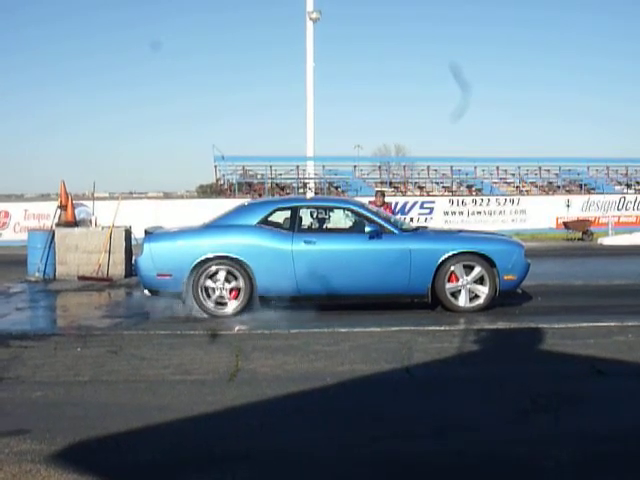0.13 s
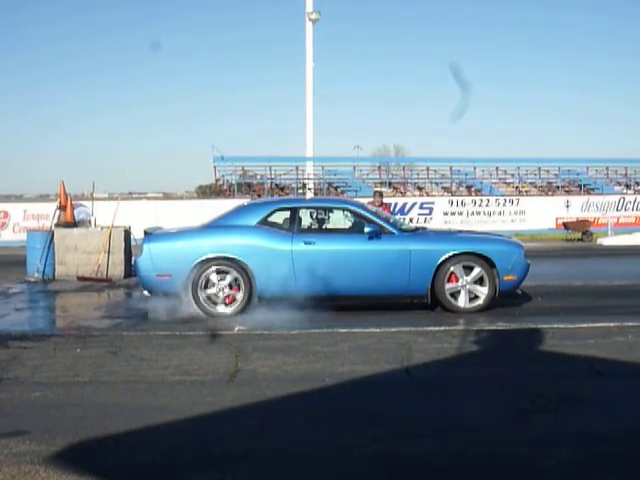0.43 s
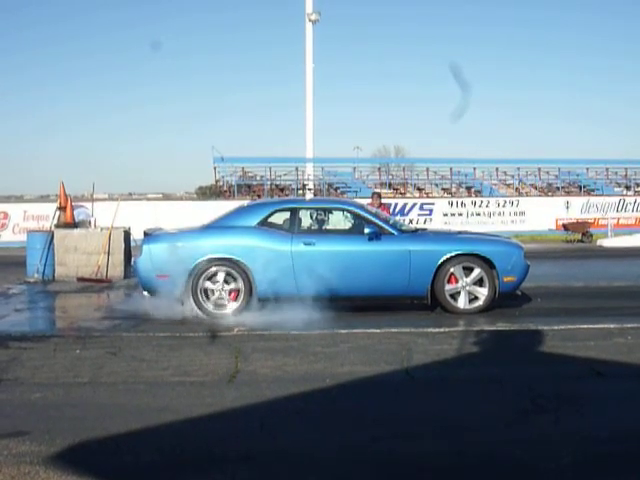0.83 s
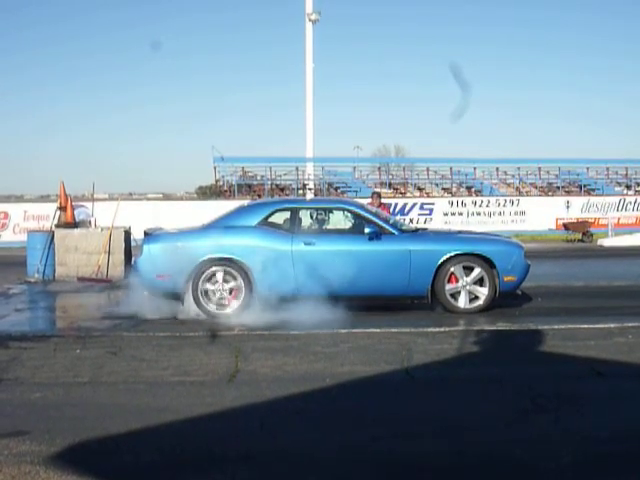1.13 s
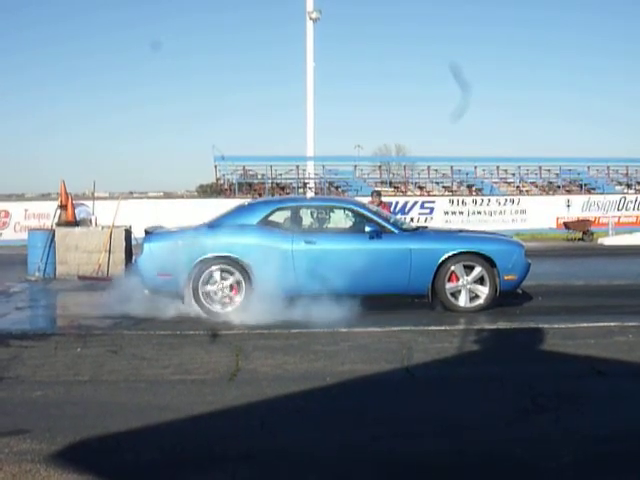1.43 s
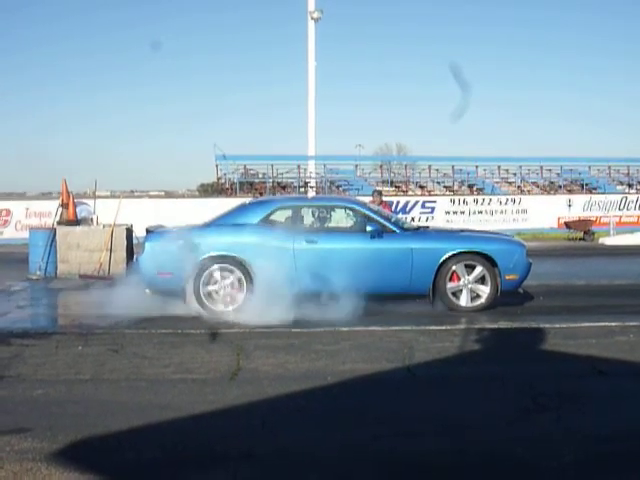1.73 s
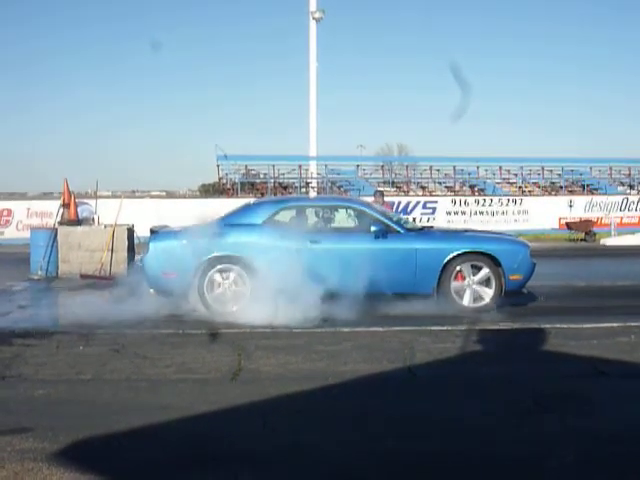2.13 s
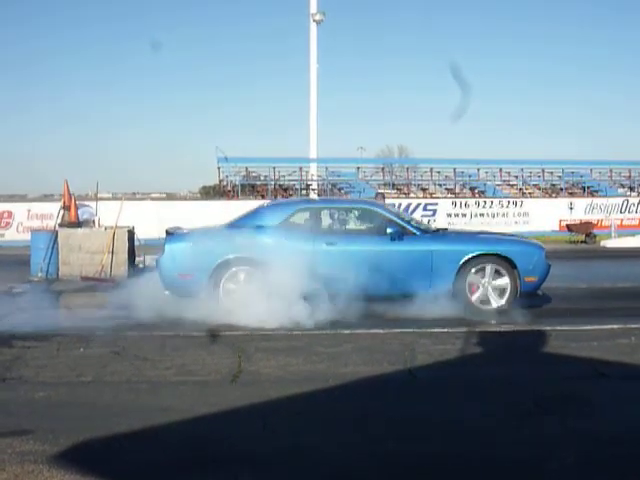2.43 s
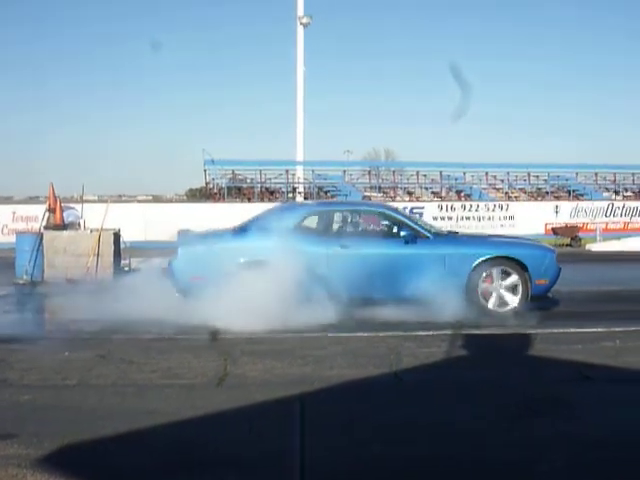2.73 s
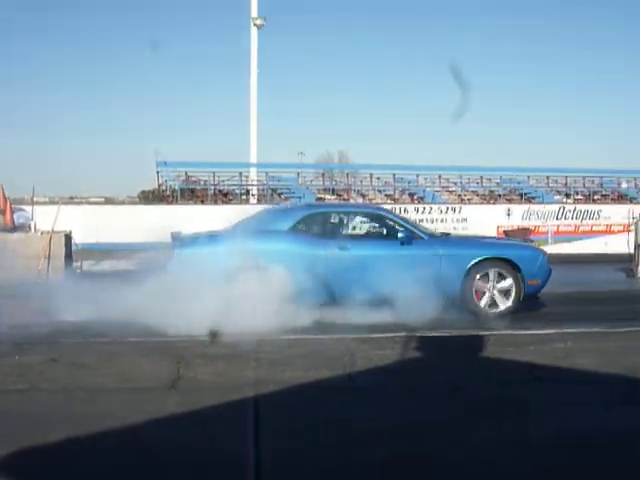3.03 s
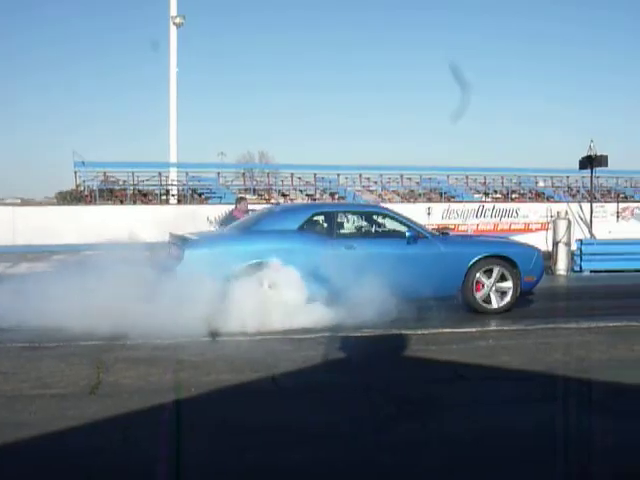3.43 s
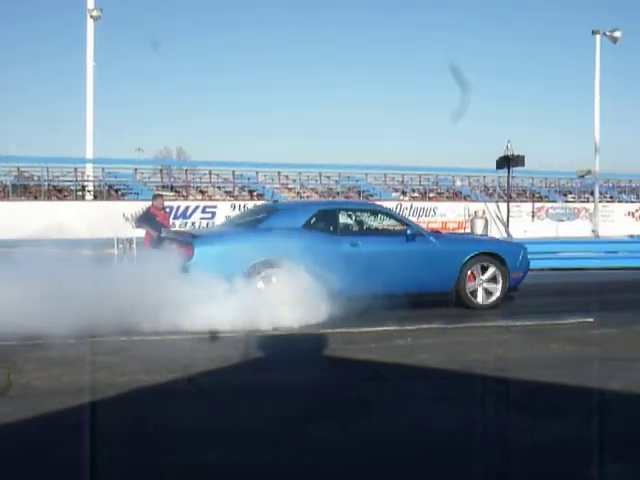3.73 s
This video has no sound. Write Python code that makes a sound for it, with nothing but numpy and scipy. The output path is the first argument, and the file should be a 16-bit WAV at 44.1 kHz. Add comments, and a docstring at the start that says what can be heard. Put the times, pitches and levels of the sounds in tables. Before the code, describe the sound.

A car engine roars through a burnout, heard trackside with slight echoes. For two seconds it labours at near-steady revs, with raspy exhaust, tyre hiss and a thin fading whine. At 2 seconds the revs flare; around 2.5 the throttle briefly shuts and reopens with dull puffs. The revs drop by 3 seconds, a faint tick follows near 3.4, and the engine sags as the car rolls off.

```python
"""A big car does a burnout at a drag strip, heard from trackside with echoes off wall and stands.
First the engine labours at near-steady revs: exhaust orders roar, gas rasps with each pulse, and
the spinning tyres hiss, their thin whine fading as they heat. At 2 s the revs flare; near 2.5 s
the throttle shuts for a moment and opens again, each time with a dull puff. By 3 s the tyres bite
and the tailpipes turn towards the listener; one faint tick follows, and the revs sag as the car rolls off."""
import sys
import numpy as np
from scipy import signal
from scipy.fft import rfft, irfft
from scipy.io import wavfile
from scipy.ndimage import uniform_filter1d

SR = 44100
rng = np.random.default_rng(int(sys.argv[2]) if len(sys.argv) > 2 else 0)


def store_pcm(level_fs):
    """Save levels as 16-bit WAV."""
    pcm = np.round(np.clip(level_fs, -1, 1) * 32767).astype(np.int16)
    wavfile.write(sys.argv[1], SR, np.atleast_2d(pcm).T)


N = 171990
T = np.arange(N) / SR


def from_db(db):
    """Decibels to gain."""
    return 10 ** (np.asarray(db) / 20)


def unit_rms(x):
    """Normalise to unit power."""
    return x / np.sqrt(np.mean(x ** 2) + 1e-20)


def automation(rows):
    """One sample-by-sample lane for each column after the time."""
    times, *columns = np.transpose(rows)
    return [np.interp(T, times, column) for column in columns]


def level_at(spectrum, hz):
    """Read an EQ curve on a log-frequency axis."""
    points_hz, db = np.transpose(spectrum)
    return np.interp(np.log(hz), np.log(points_hz), db)


def drift(rate_hz):
    """Smooth random modulator of unit power."""
    hop, settle = 40, 2000
    pole = np.exp(-2 * np.pi * hop * rate_hz / SR)
    white = rng.standard_normal(N // hop + settle + 2)
    slow = signal.lfilter([1], [1, -2 * pole, pole * pole], white)[settle:]
    return np.interp(np.arange(N) / hop, np.arange(len(slow)), unit_rms(slow))


def noise(spectrum):
    """Unit-power noise shaped by an EQ curve, rolled off past its ends."""
    hz = np.arange(N // 2 + 1) * SR / N + 1e-3
    skirts = np.minimum(1, np.minimum(hz / spectrum[0][0], spectrum[-1][0] / hz)) ** 6
    return unit_rms(irfft(rfft(rng.standard_normal(N)) * from_db(level_at(spectrum, hz)) * skirts, N))


LOW_REVS_HZ, MID_REVS_HZ, HIGH_REVS_HZ = 42.25, 44.54, 51.5
def flare(speed):
    """0 at labouring revs, 1 at high revs."""
    return np.interp(speed, [LOW_REVS_HZ, HIGH_REVS_HZ], [0, 1])


# Bass-heavy ambience: (frequency [Hz], relative level [dB])
RUMBLE_EQ = [(20, -2.5), (45, 2.5), (100, -5), (300, -10.5), (1000, -21)]
def rumble(level_db=-66):
    """A bed of distant rumble from the strip."""
    return from_db(level_db) * noise(RUMBLE_EQ)


# Slaps off the wall and grandstand: (delay [s], level [dB])
ECHO_TAPS = [(.058, -20), (.104, -18), (.163, -21)]
def echoes(car, cutoff_hz=1600):
    """Dull reflections from the far side of the strip."""
    dull = signal.sosfilt(signal.butter(1, cutoff_hz, fs=SR, output="sos"), car)
    return sum(from_db(db) * np.interp(T - delay, T, dull, left=0) for delay, db in ECHO_TAPS)


def tick(at_s=3.424, peak_db=-14, decay_s=.0003):
    """One small dry click."""
    return from_db(peak_db) * (T >= at_s) * np.exp(-abs(T - at_s) / decay_s)


# Thin whine of slipping rubber: (centre [Hz], width [Hz], starting level [dB])
WHINE_BANDS = [(1588, 60, -45), (1950, 90, -52), (2780, 130, -48)]
def tyre_whine(fade_db_per_s=5.0, wander=.015):
    """Tread blocks stick and slip: narrow, wandering noise bands that fade as the tyres heat."""
    clock = np.cumsum(1 + wander * drift(2)) / SR
    bands = 0
    for hz, width, db in WHINE_BANDS:
        envelope = drift(width / 2) + 1j * drift(width / 2)
        bands += from_db(db) * np.real(envelope * np.exp(2j * np.pi * hz * clock))
    return bands * from_db(-fade_db_per_s * T)


# Colour of the tyre hiss: (frequency [Hz], relative level [dB])
HISS_EQ = [(1000, -38), (1700, -9.5), (1790, -2.5), (1980, 0), (2280, -10), (2540, -8.5), (2810, -0.5),
           (3040, -8), (3330, -4), (3790, -11.5), (4270, -27.5), (4500, -41), (5850, -68), (9900, -120)]
# Fader ride on the hiss, ahead of its trim: (time [s], level [dB])
HISS_FADER = [(0.0, -46), (0.02, -37), (0.24, -42.5), (0.71, -41), (1.52, -43), (1.64, -41.5),
              (2.03, -43.5), (2.12, -38.5), (2.31, -38.5), (3.9, -43.5)]
def tyre_hiss(cycles, trim_db=-5.5, throb_depth=.3):
    """Rubber scrubs on the wet track, throbbing with the engine's third order."""
    fader_db, = automation(HISS_FADER)
    throb = 1 + throb_depth * np.sin(2 * np.pi * 3 * cycles)
    return from_db(trim_db + fader_db) * unit_rms(noise(HISS_EQ) * throb)


# Colour of a puff: (frequency [Hz], relative level [dB])
CHUFF_EQ = [(50, -13), (100, -2), (300, 7.5), (900, 0), (1500, -19.5), (4000, -31.5)]
# Puff cues: (time [s], level [dB], half-width [s])
CHUFF_CUES = [(2.503, -27, 0.018), (2.673, -23, 0.014), (3.429, -23, .006)]
def chuffs():
    """Short dull puffs as the throttle shuts and opens, and one under the tick."""
    envelope = sum(from_db(db) * np.exp(-((T - at) / width) ** 2) for at, db, width in CHUFF_CUES)
    return noise(CHUFF_EQ) * envelope


# Colour of the rushing gas: (frequency [Hz], relative level [dB])
RASP_EQ = [(60, -22), (110, -15), (200, -6), (400, -2), (700, -6), (950, 3.5), (1150, 2.5), (1300, -5),
           (1500, -1.5), (1750, -20.5), (2500, -17.5), (4000, -42.5)]
def gas_rasp(speed, roar, load_db, base_db=-35.5, load_follow=.4, flare_db=5, pulse_depth=.8):
    """Turbulent gas surges with each pressure pulse, louder under load and at high revs."""
    swell = abs(signal.hilbert(roar))
    pulses = swell / uniform_filter1d(swell, size=2000)
    gas = unit_rms(noise(RASP_EQ) * (1 + pulse_depth * (pulses - 1)))
    return from_db(base_db + load_follow * load_db + flare_db * flare(speed)) * gas


# Each high order at median load: (frequency [Hz], level [dB])
BUZZ_EQ = [(1400, -42.5), (1600, -47.5), (1780, -58), (1950, -52), (2300, -58.5), (2800, -55.5),
           (3400, -60), (4200, -83.5)]
def exhaust_buzz(speed, cycles, load_db):
    """Faint high orders lay a thin buzz above the bark, swelling with the load."""
    buzz = sum(from_db(level_at(BUZZ_EQ, k * speed)) * np.sin(2 * np.pi * (k * cycles + rng.random()))
               for k in range(35, 86))
    return from_db(load_db / 2) * buzz


# Exhaust tone at low, middle and high revs, and rolling away: (order, relative level [dB])
LOW_REV_TONE = [(1, -34.5), (2, -20.5), (3, -16), (4, -12.5), (5, -14), (6, -4), (7, -8), (8, -1), (9, -18),
                (10, -12), (11, -8.5), (12, -5.5), (13, -14), (14, -11.5), (15, -16.5), (16, -15),
                (17, -20.5), (18, -18), (19, -14.5), (20, -12.5), (21, 0), (22, -8), (23, -10.5), (24, -1),
                (25, -22), (26, -11), (27, -15), (28, -8), (29, -15), (30, -24), (31, -16.5), (32, -20.5),
                (33, -30), (34, -19)]
MID_REV_TONE = [(1, -38.5), (2, -26), (3, -12), (4, -15.5), (5, -20.5), (6, -9), (7, -16), (8, -10.5),
                (9, -13), (10, -4), (11, -10), (12, -10), (13, -6), (14, -5), (15, -22), (16, -15.5),
                (17, -24), (18, -11.5), (19, -6.5), (20, -7.5), (21, 1.5), (22, -20), (23, -9), (24, -4),
                (25, -10.5), (26, -17.5), (27, -14.5), (28, -14), (29, -22.5), (30, -24.5), (31, -28.5),
                (32, -17.5), (33, -22), (34, -22.5)]
HIGH_REV_TONE = [(1, -39.5), (2, -22), (3, 0), (4, -9), (5, -8), (6, -6), (7, -11), (8, -2), (9, 1),
                 (10, -10), (11, -14.5), (12, -2.5), (13, 0), (14, -9.5), (15, -17), (16, -1.5), (17, -6.5),
                 (18, -0.5), (19, -5.5), (20, -14.5), (21, -17), (22, -4.5), (23, -16.5), (24, -17),
                 (25, -24), (26, -19.5), (27, -23.5), (28, -13.5), (29, -19.5), (30, -27.5), (31, -20),
                 (32, -34.5), (33, -38.5), (34, -33.5)]
ROLLING_TONE = [(1, -38), (2, -24.5), (3, -9), (4, -16), (5, -6.5), (6, -13), (7, -15.5), (8, -2.5),
                (9, -12), (10, -9.5), (11, -12.5), (12, -15), (13, -11), (14, -10), (15, -14.5),
                (16, -10.5), (17, -18.5), (18, -13), (19, -4.5), (20, -11.5), (21, 1.5), (22, -9),
                (23, -10.5), (24, -2), (25, -13), (26, -12.5), (27, -13.5), (28, -18), (29, -12.5),
                (30, -24), (31, -16), (32, -23), (33, -26.5), (34, -19.5)]
def pipe_tone(speed, turn_s=(2.88, 3.0)):
    """Orders 1-34 morph with the revs, then crossfade as the tailpipes turn towards the listener."""
    *rev_tones, from_behind = [from_db(np.interp(np.arange(1, 35), *np.transpose(tone)))
                               for tone in (LOW_REV_TONE, MID_REV_TONE, HIGH_REV_TONE, ROLLING_TONE)]
    shares = np.array([np.interp(speed, [LOW_REVS_HZ, MID_REVS_HZ, HIGH_REVS_HZ], w) for w in np.eye(3)])
    turned = np.interp(T, turn_s, [0, 1])
    return np.transpose(rev_tones) @ shares * (1 - turned) + from_behind[:, None] * turned


# Orders 3, 6 and 8: (time [s], unused cycle rate [Hz], boom [dB], low drone [dB], high drone [dB])
BOOM_AND_DRONES = [(0.0, 46.2, -29.5, -30, -31), (0.34, 44.3, -38, -33.5, -36),
                   (0.66, 43.2, -35.5, -29, -28.5), (1.12, 42.4, -41.5, -27.5, -30.5),
                   (1.44, 42.2, -40.5, -26, -28), (1.98, 43.0, -38.5, -29, -30),
                   (2.06, 45.3, -34, -39.5, -33), (2.13, 46.8, -30.5, -31, -29),
                   (2.35, 52.3, -27, -26.5, -33), (2.4, 53.7, -27.5, -31.5, -47.5),
                   (2.45, 54.3, -26.5, -30.5, -35.5), (2.53, 53.6, -42, -28.5, -45),
                   (2.65, 51.2, -42.5, -24.5, -41), (2.69, 51.9, -28, -24, -32.5),
                   (2.77, 52.6, -28, -35.5, -48.5), (2.85, 53.6, -27, -43.5, -32.5),
                   (2.89, 52.3, -26, -39, -39.5), (2.95, 47.6, -31, -32.5, -27),
                   (2.99, 44.9, -29, -42.5, -36.5), (3.01, 44.2, -34.5, -41.5, -31),
                   (3.2, 44.8, -32.5, -40.5, -35), (3.54, 44.2, -34.5, -36, -26.5),
                   (3.81, 42.0, -36.5, -40.5, -26.5), (3.9, 41.1, -44, -34, -28)]
# Whining orders 21 and 24: (time [s], unused cycle rate [Hz], lower level [dB], upper level [dB])
BARK_WHINES = [(0.0, 46.1, -23, -39), (0.02, 46.0, -21, -49), (0.11, 45.6, -25.5, -30),
               (0.44, 43.8, -22.5, -31.5), (0.95, 42.6, -25.5, -25.5), (1.39, 42.2, -28.5, -22.5),
               (1.97, 43.0, -23, -24.5), (2.26, 50.0, -27.5, -44), (2.44, 54.3, -42.5, -39),
               (2.64, 51.6, -45, -65.5), (2.68, 51.8, -42.5, -43), (2.87, 53.5, -47.5, -44),
               (2.92, 50.0, -29, -42), (3.0, 44.1, -32.5, -28.5), (3.11, 44.8, -27.5, -23.5),
               (3.45, 44.4, -24, -31.5), (3.61, 43.8, -24, -29), (3.9, 41.1, -34.5, -28.5)]
def order_mix(speed, growl_db, bark_db):
    """Balance the growl (orders 1-17) and bark (18-34); five lead orders ride their own faders."""
    growl, bark = np.split(pipe_tone(speed), [17])
    growl = growl * from_db(growl_db) / np.linalg.norm(growl[8:], axis=0)  # levelled on orders 9-17
    bark[[21 - 18, 24 - 18]] = 0  # level the bark without its two whines
    bark_trim_db = np.interp(flare(speed) ** 2, [0, 1], [-5, -1])
    bark = bark * from_db(bark_db + bark_trim_db) / np.linalg.norm(bark, axis=0)
    gains = np.vstack([growl, bark])
    leads = np.array([3, 6, 8, 21, 24])
    gains[leads - 1] = from_db(automation(BOOM_AND_DRONES)[1:] + automation(BARK_WHINES)[1:])
    return gains


def ring_lags(gains):
    """Lag of each order [cycles] when a pipe of this tone is struck once per cycle and rings on."""
    nepers = np.log(np.r_[gains[0], gains] + 1e-9)
    mirrored = np.r_[nepers, nepers[-2:0:-1]]
    return np.imag(signal.hilbert(mirrored))[1:len(nepers)] / (2 * np.pi)


def exhaust_roar(speed, cycles, gains, flutter_hz=5.5, ragged_hz=35, ragged_db=2.5):
    """Orders of the firing cycle bunch into a chug, turning ragged while the revs change fast."""
    rev_change = uniform_filter1d(abs(np.gradient(speed)) * SR, size=5000)
    strain = np.minimum(1, rev_change / 45)  # fully ragged at 45 Hz per second
    flutter_db = 1 + flare(speed)
    roar = 0
    for k, (gain, ring) in enumerate(zip(gains, ring_lags(gains.mean(axis=1))), 1):
        lag = ring + .01 * k * k / 2 + .86 * rng.random()  # pipes delay higher orders more, with scatter
        wobble_db = flutter_db * drift(flutter_hz) + ragged_db * strain * min(1, k / 10) * drift(ragged_hz)
        roar += gain * from_db(wobble_db) * np.sin(2 * np.pi * (k * cycles - lag))
    return np.sqrt(2) * roar


# Engine revs: (time [s], full firing cycle rate [Hz])
REVS = [(0, 46.3), (.06, 45.9), (.28, 44.6), (.51, 43.6), (1.01, 42.5), (1.44, 42.2), (1.98, 43.0),
        (2.1, 46.1), (2.4, 53.7), (2.48, 54.2), (2.54, 53.4), (2.64, 51.3), (2.86, 53.6), (2.93, 49.3),
        (3.0, 44.3), (3.07, 44.6), (3.26, 44.8), (3.37, 44.2), (3.44, 44.4), (3.59, 43.9), (3.9, 41.2)]
# Faders for the low-mid growl and the bark round 1 kHz: (time [s], growl level [dB], bark level [dB])
ENGINE_FADERS = [(0.0, -23.5, -21), (0.48, -27.5, -20.5), (0.69, -26.5, -21.5), (1.4, -28, -20.5),
                 (1.98, -27, -22.5), (1.99, -27.5, -23.5), (2.04, -27.5, -19), (2.11, -25, -22.5),
                 (2.2, -23, -22), (2.4, -25, -24), (2.52, -32.5, -30), (2.61, -30, -33.5), (2.63, -31, -43),
                 (2.66, -31.5, -24.5), (2.68, -26.5, -23.5), (2.73, -20.5, -22.5), (2.85, -24, -25),
                 (2.9, -24.5, -21.5), (2.93, -23.5, -24.5), (3.01, -27, -19.5), (3.46, -26, -22.5),
                 (3.63, -28.5, -21.5), (3.86, -29.5, -21.5), (3.9, -27, -21)]
def scene(jitter_s=.000025, waver_s=.00012):
    """One rev curve drives the exhaust and the throb of the tyres; the strip answers."""
    speed, = automation(REVS)
    growl_db, bark_db = automation(ENGINE_FADERS)
    load_db = bark_db - np.median(bark_db)
    jitter = jitter_s * drift(rate_hz=50)
    waver = waver_s * flare(speed) * drift(rate_hz=14)  # the tyres grab and slip as the revs flare
    cycles = np.cumsum(speed) / SR + speed * (jitter + waver)
    roar = exhaust_roar(speed, cycles, order_mix(speed, growl_db, bark_db))
    engine = roar + exhaust_buzz(speed, cycles, load_db) + gas_rasp(speed, roar, load_db) + chuffs()
    car = engine + tyre_hiss(cycles) + tyre_whine()
    return (car + echoes(car) + rumble())[None]


def record(dry, mic_top_hz=4400, master_top_hz=16000):
    """A small narrow-band microphone cuts the treble; one thin tick rides on top."""
    mic = signal.ellip(10, .2, 80, mic_top_hz, fs=SR, output="sos")
    master = signal.ellip(10, .2, 80, master_top_hz, fs=SR, output="sos")
    return signal.sosfilt(master, signal.sosfilt(mic, dry) + tick())


dry = scene()
out = record(dry)
store_pcm(out)
```